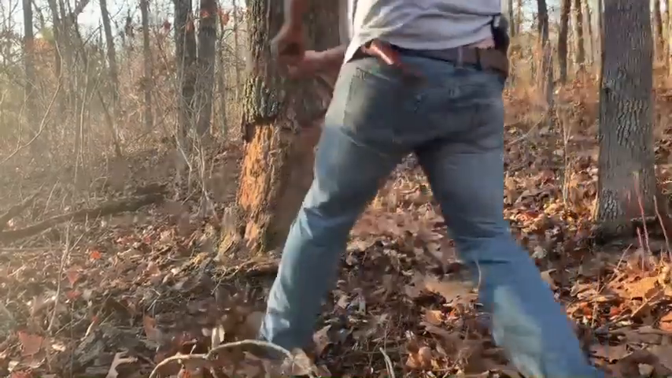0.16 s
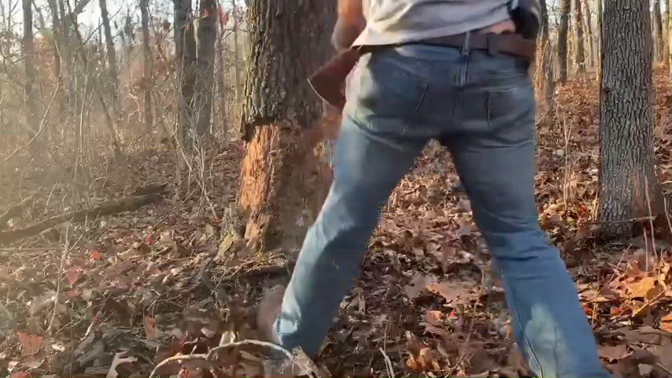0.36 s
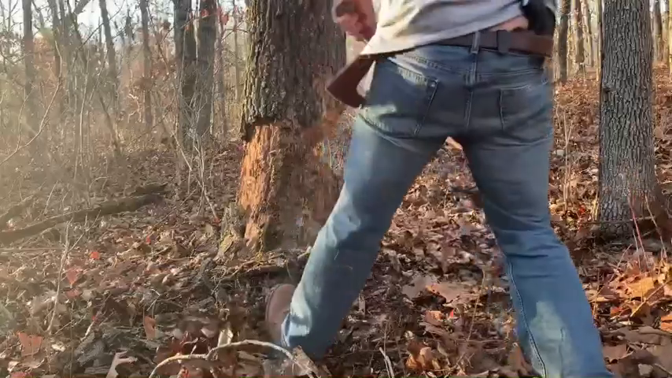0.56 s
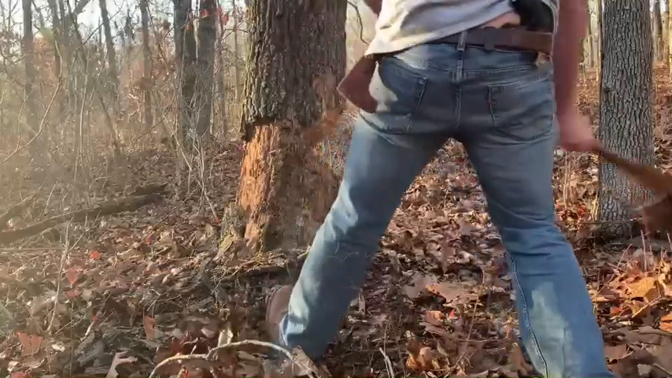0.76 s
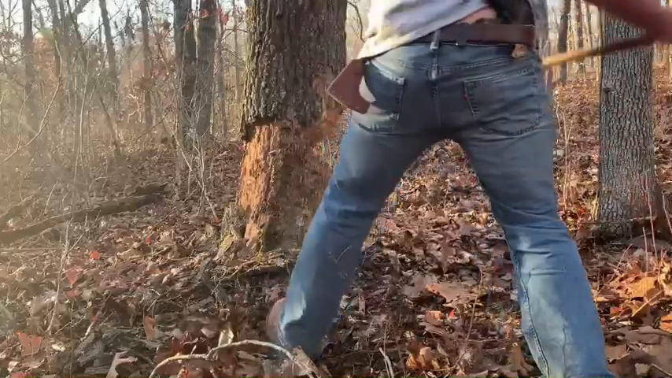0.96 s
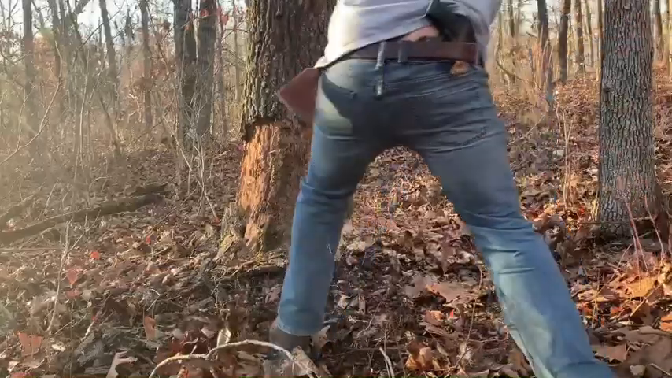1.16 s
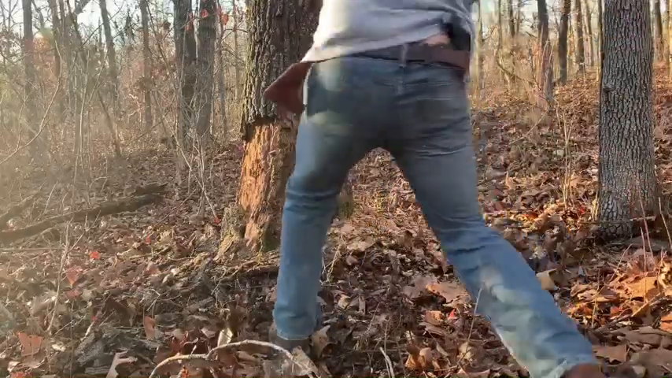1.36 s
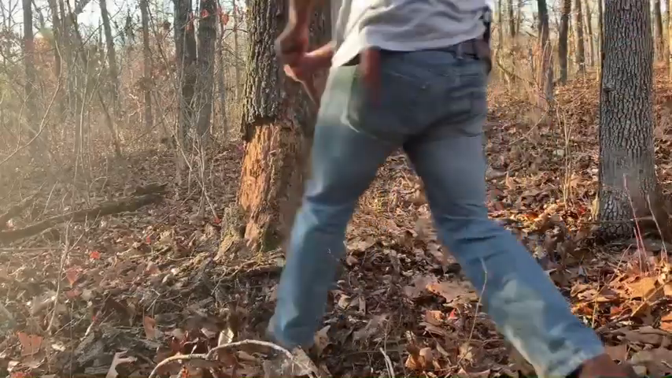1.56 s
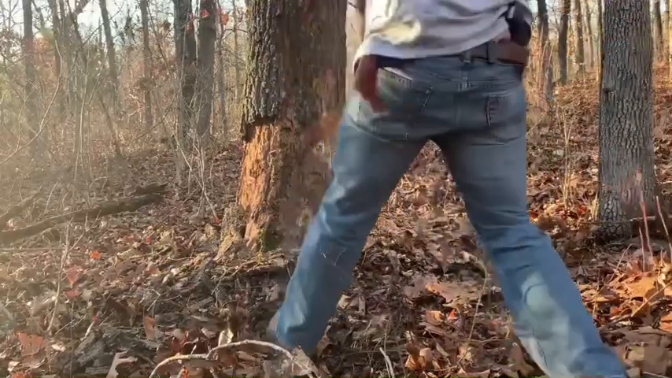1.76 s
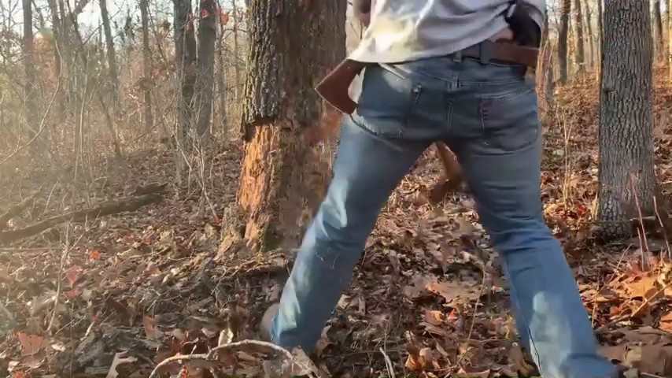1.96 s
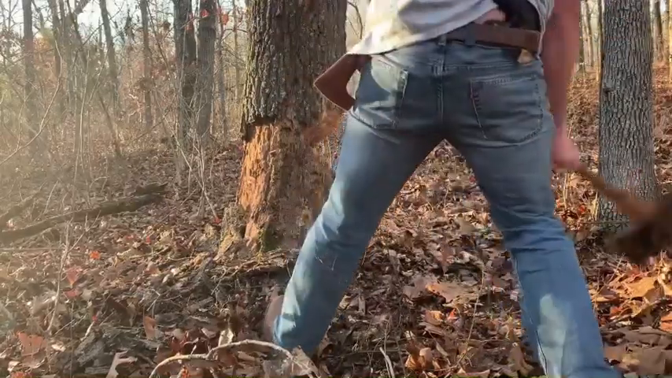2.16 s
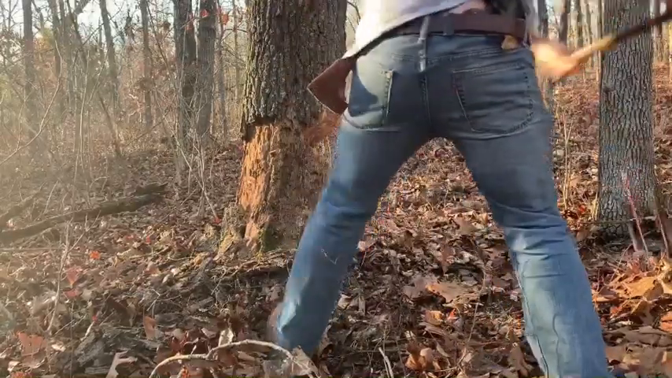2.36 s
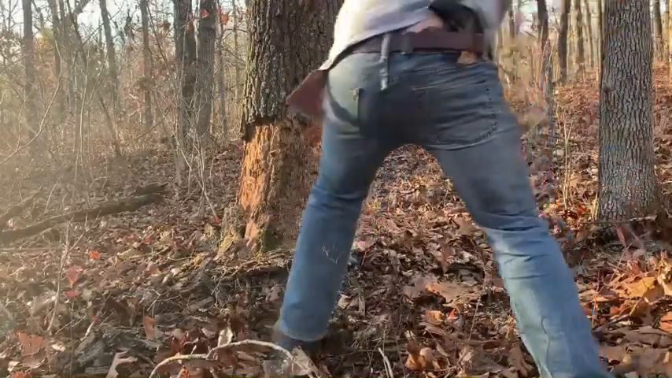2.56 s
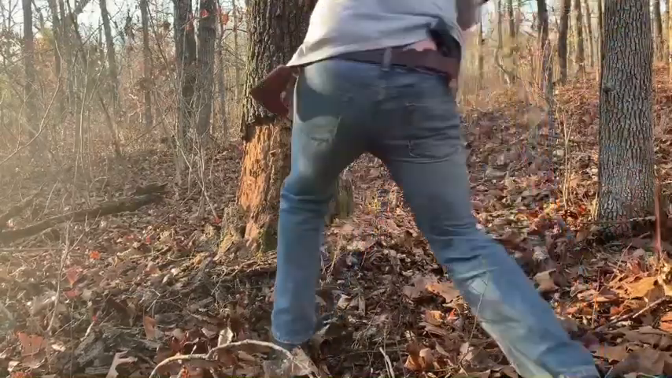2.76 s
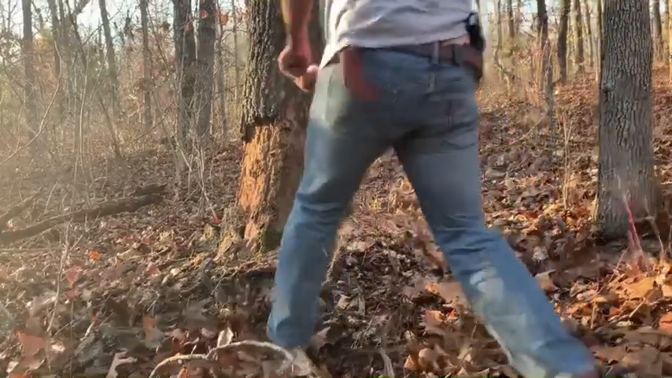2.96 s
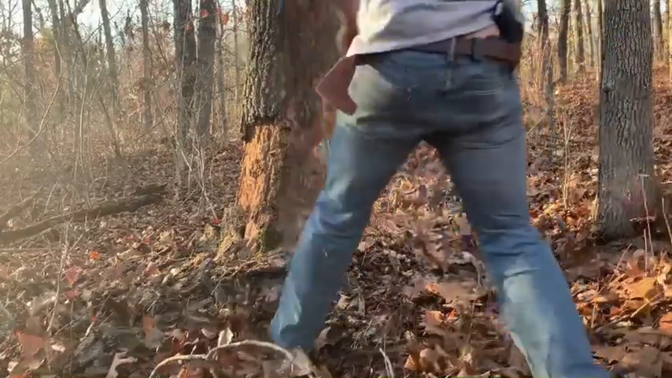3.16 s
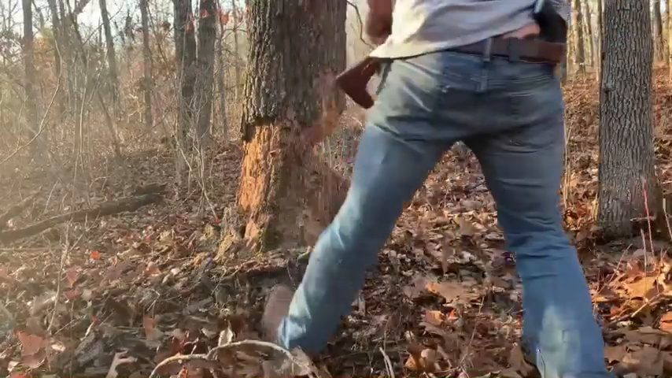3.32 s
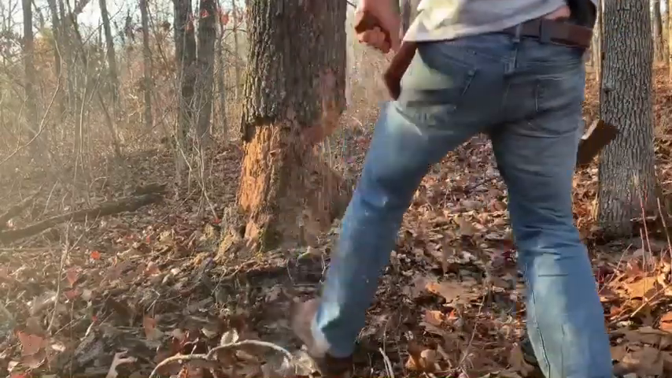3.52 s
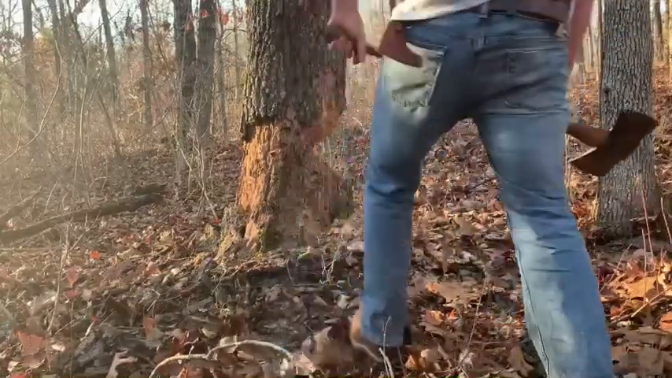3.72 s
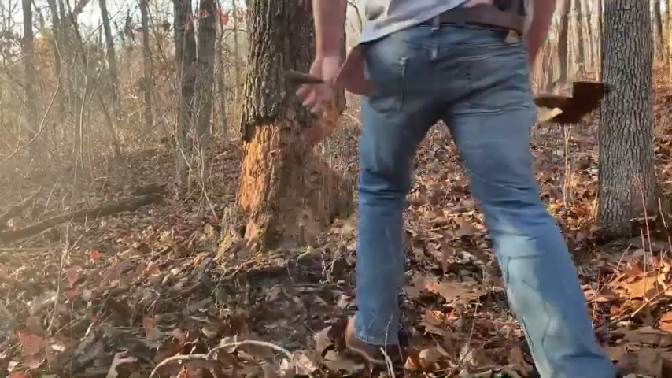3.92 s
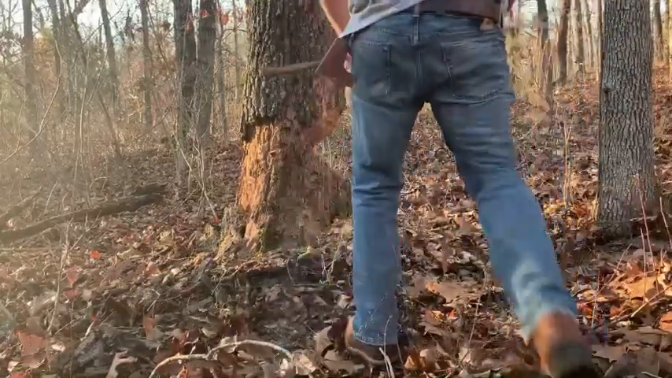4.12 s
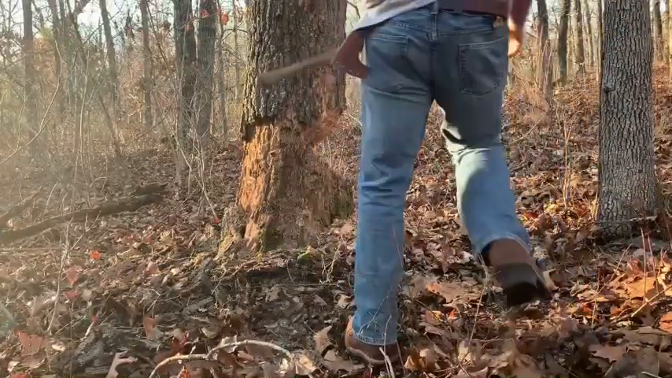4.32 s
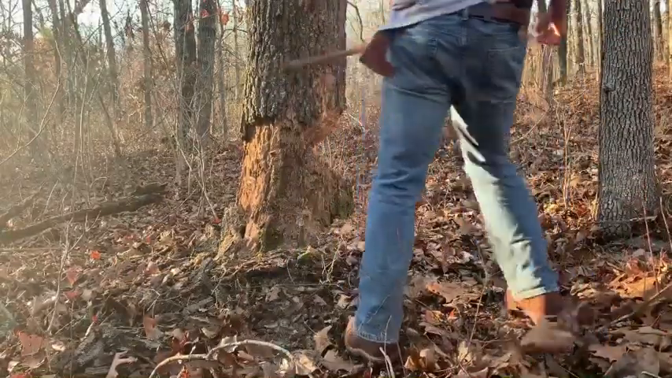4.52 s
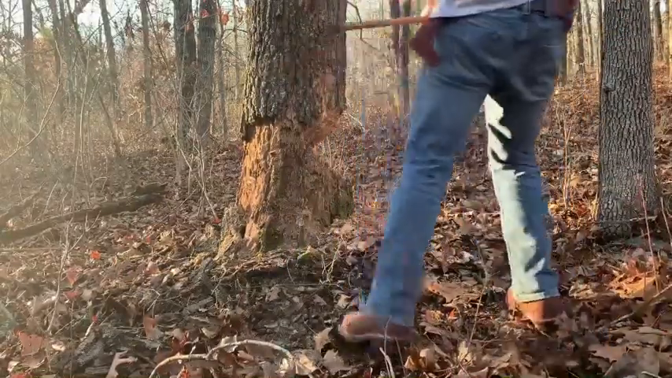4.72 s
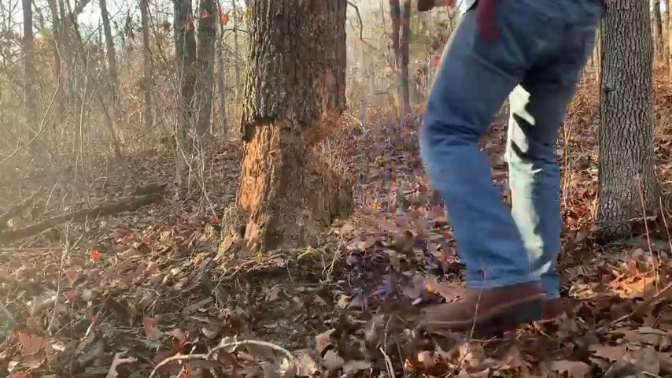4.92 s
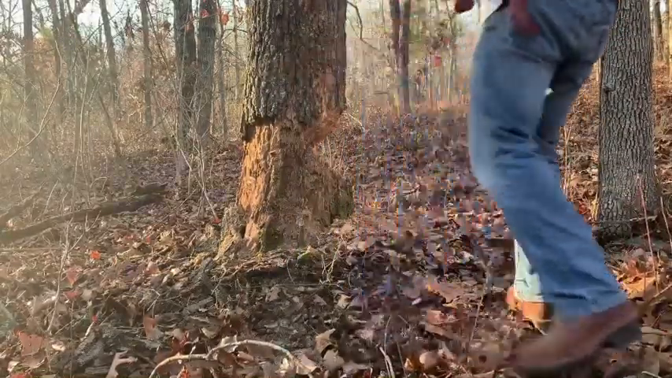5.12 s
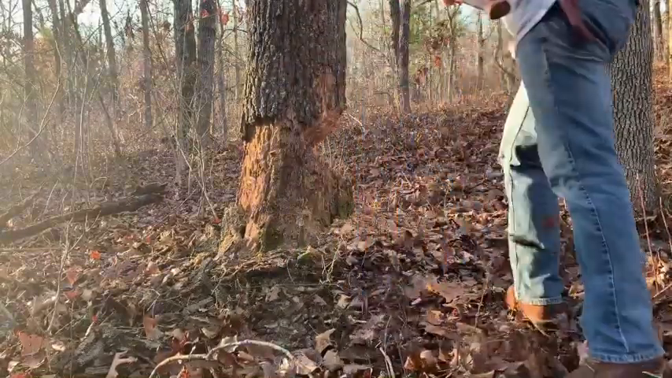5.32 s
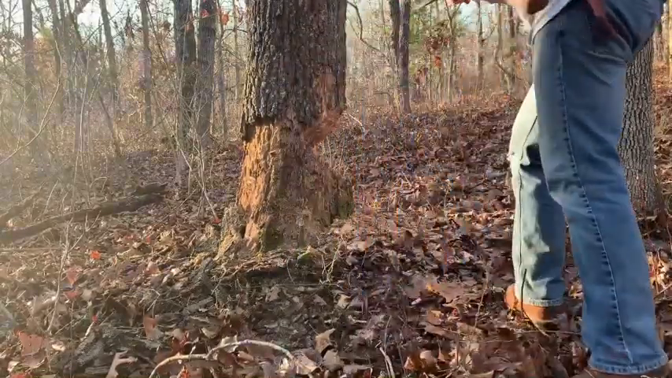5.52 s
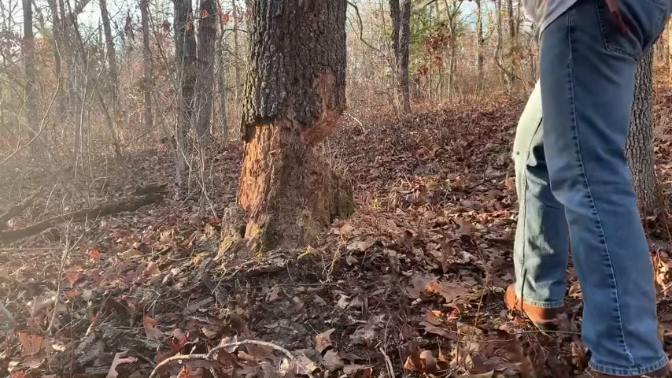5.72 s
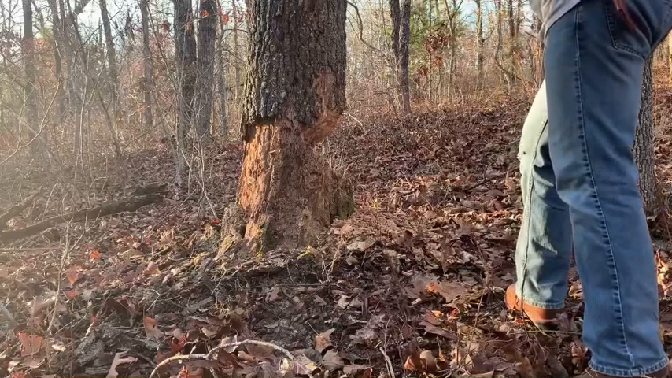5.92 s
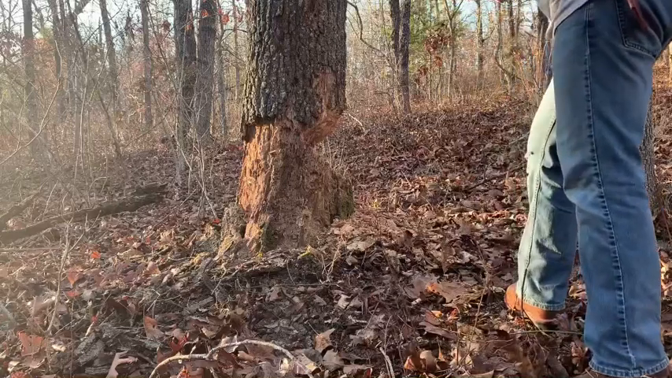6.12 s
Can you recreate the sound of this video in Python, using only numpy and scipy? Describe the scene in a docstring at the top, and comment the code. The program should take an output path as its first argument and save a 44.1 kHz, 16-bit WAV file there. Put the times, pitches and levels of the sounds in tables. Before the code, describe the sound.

An axe bites three times into a dead trunk in a quiet wood, chips patter down, then boots shuffle off through dry leaves.

```python
"""In a wood, an axe bites three times into a dead trunk, about 1.4 s apart, the first bite already begun.
Noise bursts crack the fibres, damped modes sound the trunk, roots and steel, and decaying noise echoes them.
Filtered noise and short ticks make boots shuffling in dry leaves, on past the last blow, and chips landing.
Soft thuds are heels on soil; under it all lies a low hush, picked up by two closely spaced ports."""
import sys
import numpy as np
from scipy import signal
from scipy.fft import rfft, irfft
from scipy.io import wavfile
from scipy.ndimage import uniform_filter1d

SR = 44100
rng = np.random.default_rng(int(sys.argv[2]) if len(sys.argv) > 2 else 0)


def master(y):
    """Save y as 16-bit WAV."""
    cut = np.clip(np.atleast_2d(y).T, -1, 1)
    pcm = np.round(cut * 32767)  # scale
    wavfile.write(sys.argv[1], SR, pcm.astype(np.int16))


N = 276948  # length in samples


def amp(db):
    """Amplitude factor of a level in dB."""
    return 10 ** (np.asarray(db) / 20)


def evened(x):
    """Brings x to unit RMS level."""
    return x / np.sqrt(np.mean(x ** 2) + 1e-20)


def read(points, hz):
    """Reads a curve of (Hz, value) points along a logarithmic frequency axis."""
    point_hz, value = np.transpose(points)
    return np.interp(np.log(hz + 1), np.log(point_hz + 1), value)


def add(mix, s, sound):
    """Lays a two-channel sound into the mix at time s, trimming what falls outside."""
    start = round(s * SR)
    sound = sound[:, max(-start, 0):]
    part = mix[:, max(start, 0):][:, :sound.shape[1]]
    part += sound[:, :part.shape[1]]


def bins(x):
    """The frequencies of the spectrum of x."""
    return np.fft.rfftfreq(x.shape[-1], 1 / SR)


def coloured(x, db):
    """Filters x by the spectral curve db, then brings it to unit level."""
    return evened(irfft(rfft(x) * amp(db), x.shape[-1]))


def dying(x, decay):
    """Lets every band of x die at its own rate."""
    hz, t, z = signal.stft(x, SR, nperseg=256, noverlap=192)
    z = z * amp(-60 * t / read(decay, hz)[:, None])
    return signal.istft(z, SR, nperseg=256, noverlap=192)[1][:, :x.shape[-1]]


def patchy(x, depth_db, patch_s, patch_hz):
    """Paths and surfaces that add and cancel leave drifting bright and dull patches in a sound."""
    z = signal.stft(x, SR, nperseg=512, noverlap=384)[2]
    field = rng.standard_normal(z.shape[1:])
    bins_wide, frames_long = patch_hz * 512 / SR, patch_s * SR / 128
    for axis, span in enumerate((bins_wide, frames_long)):
        keep = np.exp(-1 / span)
        field = signal.lfilter([1 - keep], [1, -keep], field, axis=axis)
    z = z * amp(depth_db * np.clip(evened(field), -2.5, 2.5))
    return evened(signal.istft(z, SR, nperseg=512, noverlap=384)[1][:, :x.shape[1]])


def crackle(size, per_s, spread_db, grain_s, wash):
    """Noise made of tiny fractures of uneven strength, over a wash of countless smaller ones."""
    strength = amp(spread_db * np.minimum(rng.exponential(1, size), 4))
    fractures = strength * (rng.random(size) < per_s / SR)
    power = signal.lfilter([1], [1, -np.exp(-2 / (grain_s * SR))], fractures ** 2)
    envelope = np.sqrt(power / (power.mean() + 1e-12) + wash)
    return evened(envelope * rng.standard_normal((2, size)))


def ticks(per_s, spread_db, low_hz, high_hz):
    """Single brittle pieces break, each ringing for a few cycles at a pitch of its own."""
    when, pitch, size, length, side = rng.random((int(per_s * N / SR), 5)).T[:, :, None]
    n = np.arange(256)
    cycles = low_hz * (high_hz / low_hz) ** pitch * n / SR
    strength = amp(spread_db * np.minimum(-np.log(size), 3.5))
    waves = strength * np.sin(2 * np.pi * cycles) * np.exp(-cycles / (1.1 + 3 * length))
    at = ((when * (N - len(n))).astype(int) + n).ravel()
    angle = 2 * np.pi * side  # shares each tick between the two channels
    return evened(np.array([np.bincount(at, (waves * share(angle)).ravel(), N) for share in (np.cos, np.sin)]))


def ring(modes, t, rise_s):
    """Damped modes that swell while the force acts; the second channel is a quarter cycle off."""
    out = np.zeros((2, len(t)))
    t = np.maximum(t, 0)
    for k, (hz, db, t60) in enumerate(modes):
        wave = (-1) ** k * amp(db) * np.exp(2j * np.pi * hz * t - np.log(1000) * t / t60)
        out += [wave.imag, wave.real]
    return out * (1 - np.exp(-(t / rise_s) ** 2))


def swell(start_s, rise_s, hold_s, settle_s):
    """Envelope of one disturbance: it builds up, lasts a while and dies away."""
    t = np.arange(N) / SR - start_s
    return np.clip(t / rise_s, 0, 1) * np.exp(-np.maximum(t - rise_s - hold_s, 0) / settle_s)


def together(envelopes):
    """Unrelated disturbances add in power."""
    return np.sqrt(sum(envelope ** 2 for envelope in envelopes))


# Colours of a clean cut, of splitting wood and of splinters flying off.
# Each row: frequency in Hz, density in dB per Hz.
CUT_COLOUR = [(30, -20.5), (100, -4.5), (280, -0.5), (400, 9), (600, 0.5), (1100, 1), (1600, -17.5),
              (2000, -13.5), (3200, -13.5), (4200, -14), (7000, -11.5), (9000, -8.5), (12000, -17),
              (16000, -13.5)]
SPLIT_COLOUR = [(30, -39.5), (300, -14), (600, -1), (1100, 1.5), (1600, -9), (2200, -1), (3300, -8.5),
                (4200, 0.5), (5200, -9), (7000, -13.5), (10000, -9.5), (16000, -16.5)]
SPRAY_COLOUR = [(300, -23), (1500, -12), (2100, 1), (2800, 5), (3500, -2), (4500, -2), (7000, -10),
                (16000, -24)]
# Modes of the axe head. Each row: frequency in Hz, level in dB, t60 in seconds.
STEEL_MODES = [(1996, 0, 0.11), (2660, -13.5, 0.19), (3155, -2.5, .03), (5600, -5, 0.022), (8640, 5, .02),
               (10200, 2, .03)]


def blade(crack_db, steel_db, bite_s, splinter):
    """Fibres break for as long as the blade sinks in; splinters fly off and the steel rings briefly."""
    t = np.arange(2 ** 14) / SR
    fibres = crackle(len(t), per_s=1700, spread_db=-0.5, grain_s=0.00028, wash=0.59)
    hz = bins(fibres)
    colour = splinter * read(SPLIT_COLOUR, hz) + (1 - splinter) * read(CUT_COLOUR, hz)
    crack = coloured(patchy(fibres, depth_db=4, patch_s=0.018, patch_hz=150), colour)
    crack *= np.minimum(t / (0.2 * bite_s), 1) * np.exp(-np.maximum(t - bite_s, 0) / 0.0049)
    spray = amp(-20) * splinter * coloured(fibres, read(SPRAY_COLOUR, hz))
    spray *= np.exp(-t / 0.083) * (1 - np.exp(-t / 0.0064))
    steel = ring(STEEL_MODES, t, rise_s=0.00013)
    return amp(crack_db) * (crack + spray) + amp(steel_db) * steel


# The axe blows. Each row: start in seconds, crack, knock, thump and steel ring each in dB,
# bite time in seconds, splintering from 0 to 1, echo in dB.
BLOWS = [(-0.026, -16.5, -8, -12.5, -47, 0.0097, 0.39, -39.5),
         (1.4716, -9.5, -7, -11.5, -32, 0.0071, 0.72, -42.5),
         (2.8968, -8.5, -8.5, -14, -21, .0040, .05, -37)]
# Modes of the trunk, of the stem on its roots and of the chip being split off.
# Each row: frequency in Hz, level in dB, t60 in seconds.
TRUNK_MODES = [(447, -14, 0.028), (555, -2.5, .045), (697, -6, 0.023), (940, -4, 0.04), (1067, -3, .05),
               (1342, -14, 0.053)]
ROOT_MODES = [(76, -21.5, 0.42), (113, -10.5, .16), (139.5, -2.5, 0.09), (170, 1, 0.074), (219, -8, 0.08),
              (253, 1, 0.11), (293, -17.5, 0.09)]
CHIP_MODES = [(2104, -6, 0.075), (2260, -9, 0.07), (2670, -23.5, 0.11), (2670, -12, .07), (4360, -9, 0.053),
              (5650, -20, 0.14), (6400, -14, 0.086)]
# Colours of cut and split as the wood returns them, and of the ground and nearest trunks.
# Each row: frequency in Hz, density in dB per Hz.
CUT_ECHO = [(30, -7.5), (120, 5), (250, 2), (400, 2.5), (650, 2.5), (1100, -4), (1400, -14), (1850, -9),
            (2020, -5.5), (2200, -12), (5000, -19), (16000, -30.5)]
SPLIT_ECHO = [(30, -9), (120, 3.5), (250, -1.5), (400, -1.5), (650, -5.5), (1100, -5.5), (1500, -8),
              (1850, -10), (2200, 4), (2800, -0.5), (3500, -10), (7000, -8.5), (16000, -21)]
NEAR_COLOUR = [(30, -14), (70, -2), (130, -3), (250, -5), (400, -9.5), (1000, -16.5), (1500, -23.5),
               (2500, -19), (6000, -29), (16000, -32)]
# Decay of the deep wood and of the near echo. Each row: frequency in Hz, t60 in seconds.
WOODS_DECAY = [(50, 1.2), (200, 2.2), (500, 2.06), (1000, 2.6), (2500, 2.1), (6000, .9), (16000, .5)]
NEAR_DECAY = [(60, 0.75), (130, 0.4), (300, 0.2), (1000, 0.2), (16000, 0.28)]
SLAP_S, SLAP_DB = 0.059, -25.5  # a big trunk some ten metres off; level relative to the knock
STEEL_ECHO_DB = -33.5  # relative to the ring of the axe head


def chop(crack_db, knock_db, thump_db, steel_db, bite_s, splinter, echo_db):
    """The trunk knocks at once and heaves as the blade stops; the wood answers."""
    t = np.arange(2 ** 16) / SR
    early = t[:len(t) // 4]

    # the deep wood answers slowly and from all sides
    trunks = crackle(len(t), per_s=530, spread_db=2.0, grain_s=0.0034, wash=0.93)
    trunks = patchy(trunks, depth_db=4.0, patch_s=0.028, patch_hz=80)
    hz = bins(trunks)
    echo_colour = splinter * read(SPLIT_ECHO, hz) + (1 - splinter) * read(CUT_ECHO, hz)
    far = dying(coloured(trunks, echo_colour), WOODS_DECAY) * (1 - np.exp(-t / 0.012))
    out = amp(echo_db) * far * amp([[-1], [3]])  # shared part, differing part
    # the lowest steel mode, scattered by the same trunks
    singing = evened(irfft(rfft(trunks) * rfft(ring(STEEL_MODES[:1], t, rise_s=0.002))))
    out += amp(steel_db + STEEL_ECHO_DB) * dying(singing, WOODS_DECAY) * (1 - np.exp(-t / 0.02))

    # the ground and the nearest trunks answer quickly
    ground = rng.standard_normal((2, len(early)))
    near = dying(coloured(ground, read(NEAR_COLOUR, bins(ground))), NEAR_DECAY)
    near *= amp(-23) * (1 - np.exp(-early / 0.0035))

    knock = ring(TRUNK_MODES, early - 0.0005, rise_s=0.0012)
    knock += splinter * ring(CHIP_MODES, early, rise_s=0.002)
    thump = ring(ROOT_MODES, early - 0.8 * bite_s, rise_s=0.0023)
    bite = blade(crack_db, steel_db, bite_s, splinter)
    add(out, 0, near + amp(knock_db) * knock + amp(thump_db) * thump + bite)
    slap = ring(TRUNK_MODES[:3], early, rise_s=0.002)
    add(out, SLAP_S, amp(knock_db + SLAP_DB) * slap)
    return out


# The far hush. Each row: frequency in Hz, density in dB per Hz.
AIR_COLOUR = [(15, -36), (25, -7), (76, 6), (120, -5.5), (394, -24.5), (1160, -21.5), (6740, -27.5),
              (8830, -36.5), (11000, -27.5), (13200, -40.5), (14800, -25), (16000, -30)]
AIR_DB = -67.5


def air():
    """The low, far hush of the wood: steady noise in a fixed colour."""
    noise = rng.standard_normal((2, N))
    return amp(AIR_DB) * coloured(noise, read(AIR_COLOUR, bins(noise)))


# Dry leaves rubbing. Each row: frequency in Hz, density in dB per Hz.
LEAF_COLOUR = [(100, -7), (400, -13), (1500, -7.5), (2400, -3), (3200, -3.5), (4300, -1.5), (5600, -2),
               (7000, 1.5), (10000, 2.5), (12500, -1.5), (15000, 1.5), (16000, -10)]
# A boot shifts, pivots or steps; the tread plays these too. Each row: start, rise and hold in seconds,
# rustle of loose leaves in dB, crunch of packed litter in dB.
SHUFFLES = [(0.035, 0.068, 0.038, -42, -71.5), (0.192, .03, 0.094, -54, -58.5),
            (0.816, .03, 0.16, -63, -75), (0.98, .04, 0.12, -58.5, -59.5), (1.114, 0.032, 0.11, -52.5, -61),
            (1.277, 0.048, .025, -46, -59), (1.853, 0.0092, 0.085, -49.5, -59),
            (2.084, 0.041, 0.26, -53, -57.5), (2.533, 0.082, 0.045, -48.5, -58),
            (2.657, 0.038, 0.074, -44, -59.5), (3, 0.14, 0.096, -47.5, -55),
            (3.301, 0.11, 0.25, -45.5, -53), (3.757, 0.049, 0.18, -47.5, -57.5),
            (4.027, 0.07, 0.039, -42, -51.5), (4.192, 0.043, 0.11, -48.5, -62.5),
            (4.454, .015, 0.024, -44.5, -49.5), (4.547, 0.047, 0.017, -54, -48.5),
            (4.69, 0.094, 0.21, -45, -51), (5.008, 0.098, 0.075, -41.5, -47.5),
            (5.184, 0.036, 0.09, -45.5, -52.5), (5.447, 0.033, 0.067, -65.5, -66.5),
            (5.633, 0.014, 0.032, -61, -66.5), (5.755, .01, .015, -65.5, -69),
            (5.999, 0.034, 0.089, -72, -78), (6.19, 0.036, .04, -70.5, -69)]
LEAF_SETTLE_S = 0.06  # time to die down to 1/e
STIR_DB, STIR_RISE_S, STIR_HOLD_S = -56.5, 1.6, 3.7  # the leaves never quite rest while the chopper works


def leaves():
    """A fizz of rubbing leaves with single brittle ones breaking in it, stirred by the boots."""
    fizz = crackle(N, per_s=800, spread_db=1.5, grain_s=0.00097, wash=1.0)
    fizz = patchy(fizz, depth_db=3, patch_s=0.015, patch_hz=200)
    breaks = ticks(per_s=400, spread_db=1.0, low_hz=3896, high_hz=14600)
    rustle = coloured(fizz, read(LEAF_COLOUR, bins(fizz))) + amp(-10) * breaks
    boots = [amp(db) * swell(s, rise_s, hold_s, LEAF_SETTLE_S) for s, rise_s, hold_s, db, _ in SHUFFLES]
    stir = amp(STIR_DB) * swell(0, STIR_RISE_S, STIR_HOLD_S, LEAF_SETTLE_S)
    return rustle * together(boots + [stir])


# Boots and chunks of wood meeting the soil. Each row: start in seconds, level in dB.
STEPS = [(0.021, -34), (0.275, -42.5), (1.535, -45), (3.19, -54.5), (4.22, -53), (4.487, -31),
         (4.68, -45.5), (5.14, -51)]
# Colour of the soil. Each row: frequency in Hz, density in dB per Hz.
SOIL_COLOUR = [(25, -3.5), (65, -1), (130, -3.5), (280, -10.5), (420, -18.5), (900, -13), (1500, -28.5),
               (4000, -42), (16000, -59.5)]
# Decay of the soil. Each row: frequency in Hz, t60 in seconds.
SOIL_DECAY = [(50, 0.29), (120, 0.28), (300, 0.16), (1000, 0.076), (16000, .03)]


def step(level_db):
    """A heel or a chunk of wood pushes into soft soil: a dull thud whose bass lingers."""
    t = np.arange(SR // 2) / SR
    noise = rng.standard_normal((2, len(t)))
    thud = dying(coloured(noise, read(SOIL_COLOUR, bins(noise))), SOIL_DECAY)
    return amp(level_db) * thud * (1 - np.exp(-t / 0.0013))


# Packed litter underfoot. Each row: frequency in Hz, density in dB per Hz.
LITTER_COLOUR = [(40, -11.5), (150, -5), (350, 1.5), (500, -6), (750, -3), (1200, 1), (1700, -4),
                 (2400, -2), (4200, -7.5), (16000, -25)]
LITTER_SETTLE_S = 0.067  # time to die down to 1/e


def tread():
    """Packed litter crunches lower down when weight comes onto it, and dry stalks break in it."""
    crunch = crackle(N, per_s=370, spread_db=3.0, grain_s=0.0031, wash=1.0)
    crunch = patchy(crunch, depth_db=2.0, patch_s=0.011, patch_hz=120)
    stalks = ticks(per_s=70, spread_db=4, low_hz=1997, high_hz=6000)
    litter = coloured(crunch, read(LITTER_COLOUR, bins(crunch))) + amp(-7) * stalks
    weight = together(amp(db) * swell(s, rise_s, hold_s, LITTER_SETTLE_S) for s, rise_s, hold_s, _, db in SHUFFLES)
    return litter * weight


# Chips landing and twigs snapping. Each row: start in seconds, level in dB, centre in Hz,
# t60 in seconds, colour width in octaves.
SNAPS = [(0.222, -37, 3000, 0.016, 1), (0.511, -38.5, 4000, 0.022, 3.6), (0.568, -41.5, 4300, .025, 1.4),
         (0.643, -38, 9050, 0.013, 2.5), (0.705, -44, 9000, 0.065, 2.9), (0.799, -42, 4700, 0.022, 0.8),
         (0.9475, -26, 9000, .015, 1.84), (0.9514, -27.5, 10100, 0.023, 0.65),
         (1.361, -33, 5660, 0.019, 0.55), (1.576, -33.5, 9000, 0.07, 0.4),
         (1.7205, -29.5, 10000, 0.021, 0.87), (1.7424, -21, 6270, 0.028, 0.83),
         (1.968, -33.5, 1400, 0.013, 0.76), (1.979, -31.5, 4970, 0.014, 1.7),
         (2.1005, -33.5, 7360, 0.056, 1.6), (2.2072, -18.5, 6100, 0.019, 1.04),
         (2.254, -22.5, 8950, 0.028, 1.34), (2.312, -29, 7000, 0.033, 0.54), (2.323, -35, 9900, 0.02, 0.93),
         (2.366, -36.5, 1600, 0.02, .89), (2.7045, -32.5, 6120, .038, 0.69),
         (3.501, -26.5, 10000, 0.022, 3), (3.574, -24, 10400, 0.017, 2.4), (3.768, -34.5, 9040, .033, 2.3),
         (4.3296, -31.5, 2640, 0.034, .48), (4.463, -41.5, 4160, 0.065, 1.3),
         (4.484, -29, 2160, 0.028, 1.6), (4.6015, -27, 9950, 0.012, 1.1), (5.034, -31, 9700, 0.053, 1.5),
         (5.1655, -24.5, 9000, 0.011, 3.5), (5.23, -33.5, 3810, 0.033, 1.07),
         (5.519, -43.5, 6630, 0.025, 1.2), (5.765, -45.5, 4400, 0.028, 1.1),
         (5.999, -55.5, 5280, .022, 0.99)]
SNAP_RISE_S, SNAP_RIPPLE_DB = 0.0005, 4.5


def snap(level_db, centre_hz, t60, octaves):
    """A chip or twig gives one broad, quickly dying tick with resonances of its own."""
    t = np.arange(2 ** 12) / SR
    noise = rng.standard_normal((2, len(t)))
    hz = bins(noise)
    ripple_db = SNAP_RIPPLE_DB * evened(uniform_filter1d(rng.standard_normal(len(hz)), size=40))
    away = np.log2((hz + 1) / centre_hz) / octaves
    tick = coloured(noise, ripple_db - 10 * np.log10(1 + away ** 4))
    settling = amp(-28.0) * np.exp(-t / 0.021)  # the leaves around it settle
    fade = np.exp(-np.log(1000) * t / t60) + settling
    return amp(level_db) * tick * (1 - np.exp(-t / SNAP_RISE_S)) * fade


CRUMBS_PER_S, CRUMB_SPAN_S = 6.5, 5.6  # until the chopper stands still
CRUMB_DB, CRUMB_SPREAD_DB, CRUMB_HZ = -54.5, 4, 6500  # softest level, mean rise above it, middle pitch


def crumbs():
    """Crumbs of bark drop and bent leaves spring back at random moments: faint single ticks."""
    out = np.zeros((2, N))
    for when, size, pitch in rng.random((int(CRUMBS_PER_S * CRUMB_SPAN_S), 3)):
        level_db = CRUMB_DB - CRUMB_SPREAD_DB * np.log(size)
        centre_hz = CRUMB_HZ * 2 ** (2 * pitch - 1)  # up to an octave either way
        add(out, when * CRUMB_SPAN_S, snap(level_db, centre_hz, t60=0.022, octaves=1.2))
    return out


# Bark and chips coming down into the leaves. Each row: start in seconds, length in seconds, level in dB.
SHOWERS = [(0.517, 0.078, -59), (0.697, 0.016, -53), (0.944, 0.019, -51), (1.571, 0.1, -42.5),
           (1.733, 0.029, -46.5), (2.2, 0.12, -39.5), (3.57, 0.022, -47)]
# Colour of chips on leaves. Each row: frequency in Hz, density in dB per Hz.
PATTER_COLOUR = [(100, -13), (1500, -13), (2800, -6), (4300, 2.5), (7000, 2.5), (10000, 2), (12500, -1.5),
                 (15000, 1.5), (16000, -10)]
SHOWER_RISE_S, SHOWER_SETTLE_S = 0.008, 0.0487  # build-up; time to die down to 1/e


def showers():
    """Light chips patter on top of the leaves, thinner and brighter than a boot."""
    patter = crackle(N, per_s=550, spread_db=3, grain_s=0.00092, wash=0.67)
    patter = patchy(patter, depth_db=3.0, patch_s=0.014, patch_hz=200)
    fall = together(amp(db) * swell(s, SHOWER_RISE_S, length_s, SHOWER_SETTLE_S) for s, length_s, db in SHOWERS)
    return coloured(patter, read(PATTER_COLOUR, bins(patter))) * fall


# How alike the two ports hear. Each row: frequency in Hz, likeness from -1 to 1.
LIKENESS = [(30, .7), (150, 1), (600, 0.44), (1200, 0.3), (2200, 0.023), (3300, -0.28), (4400, 0.0017),
            (5400, -0.42), (6500, .3), (7400, 0.76), (8400, 1), (9600, 0.82), (11000, 0.96), (12200, .55),
            (13300, 0.69), (14700, .6), (15600, 0.84)]
# Balance of the ports. Each row: frequency in Hz, left minus right in dB.
BALANCE = [(30, 3), (150, 1.5), (300, 0.5), (700, 1), (2000, 1), (4000, -0.5), (5400, -5.5), (6800, 0),
           (16000, 0)]
# Phase between the ports. Each row: frequency in Hz, lead of the right in turns.
PORT_LEAD = [(0, 0), (6200, 0), (8000, .46), (8900, .54), (10600, 1), (11500, 1), (12700, 1.47),
             (13900, 1.53), (15300, 2), (22050, 2)]


def ports(x):
    """Turns a shared and a differing part into the signals of two closely spaced ports."""
    hz = bins(x)
    shared, differing = rfft(x)
    like = read(LIKENESS, hz)
    shared = shared * np.sqrt((1 + like) / 2)
    differing = differing * np.sqrt((1 - like) / 2)
    lean = amp(read(BALANCE, hz) / 2)
    lead = np.exp(2j * np.pi * read(PORT_LEAD, hz))
    return irfft([(shared + differing) * lean, (shared - differing) / lean * lead], N)


def scene():
    """Blows, chips and leaves in the hush of the wood, as the two ports pick them up."""
    mix = leaves() + showers() + air()
    for table, source in ((BLOWS, chop), (SNAPS, snap), (STEPS, step)):
        for s, *row in table:
            add(mix, s, source(*row))
    boots = ports(tread()) * amp([[-2], [2]])  # the chopper stands to the right
    fade_in = np.minimum(np.arange(N) / 64, 1)
    return (ports(mix + crumbs()) + boots) * fade_in


LOW_CUT_HZ, EDGE_HZ = 21, 15900  # bass cut and upper band limit


def record(dry):
    """The microphone sheds the deepest bass and rounds off the loudest peaks; then the band limit."""
    lean = signal.sosfilt(signal.butter(2, LOW_CUT_HZ, "high", fs=SR, output="sos"), dry)
    rounded = lean / (1 + (lean / 0.95) ** 4) ** 0.25
    band_limit = signal.firwin(255, EDGE_HZ, window=("kaiser", 8), fs=SR)
    return signal.oaconvolve(rounded, band_limit[None], "same")


dry = scene()
out = record(dry)
master(out)
```